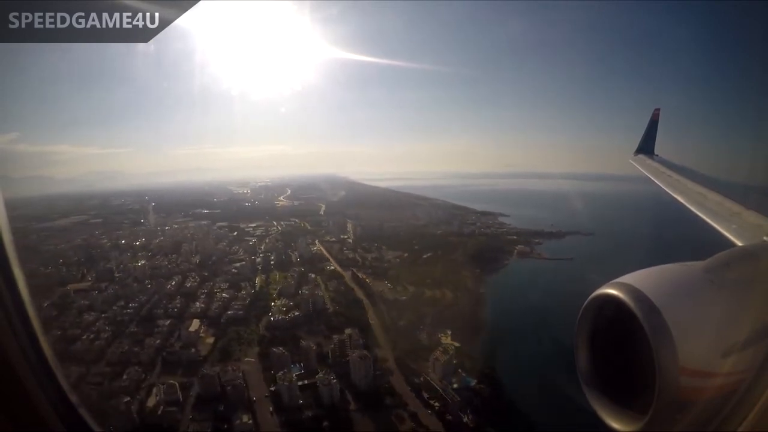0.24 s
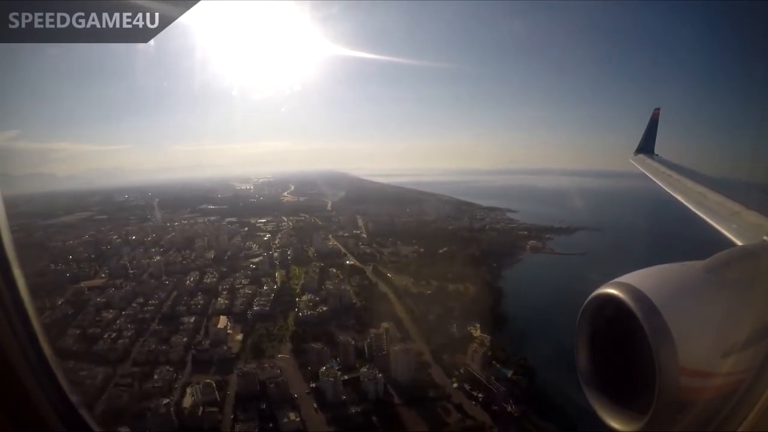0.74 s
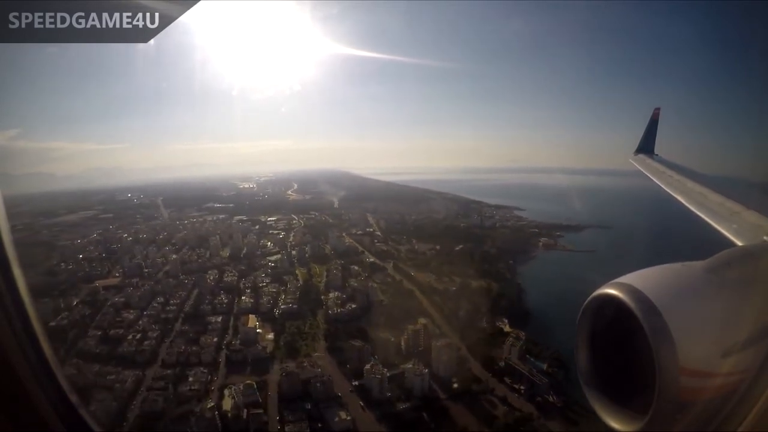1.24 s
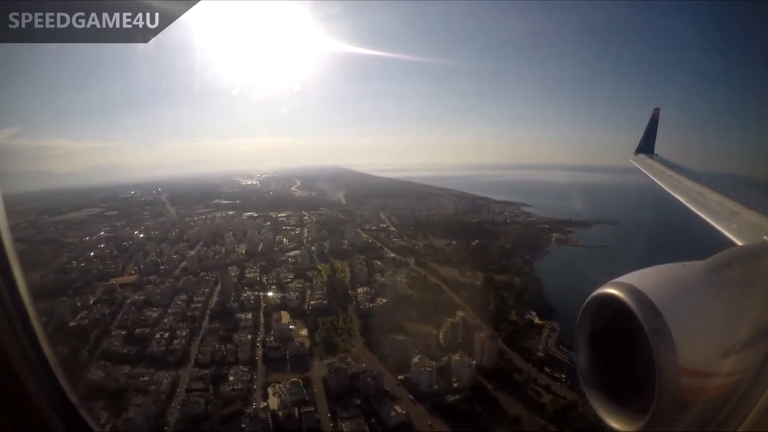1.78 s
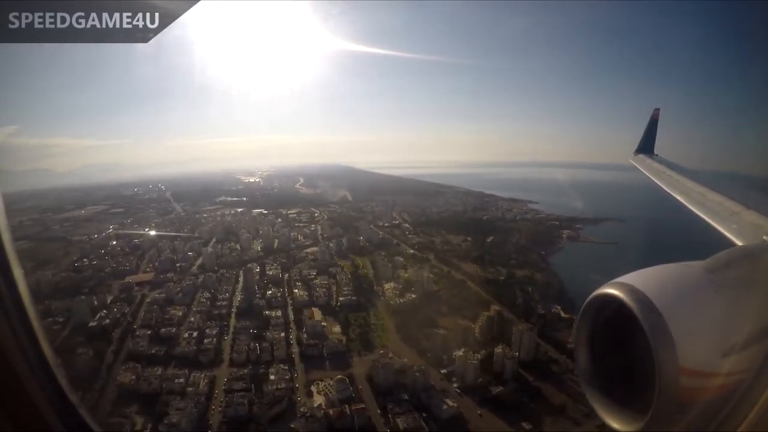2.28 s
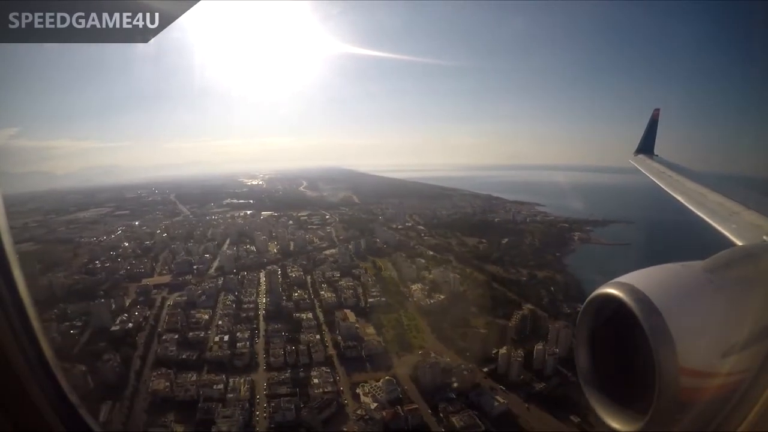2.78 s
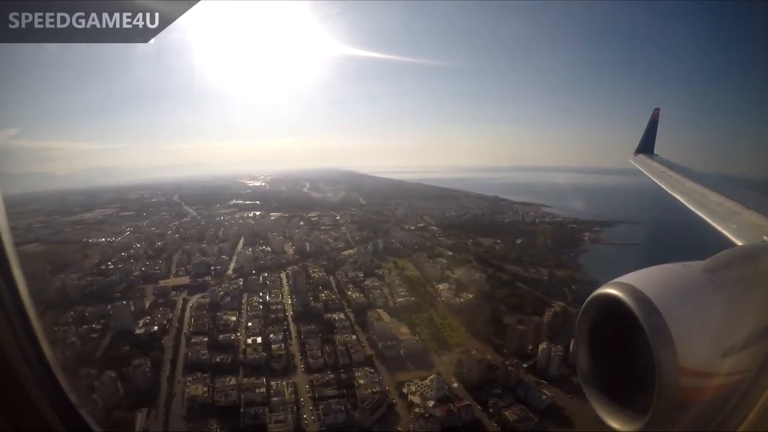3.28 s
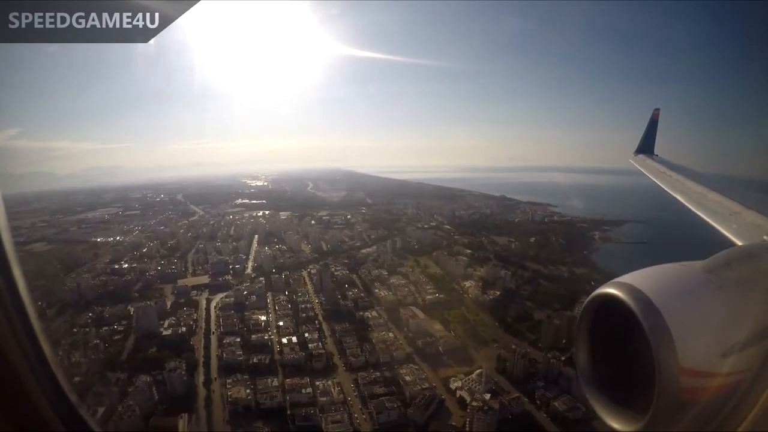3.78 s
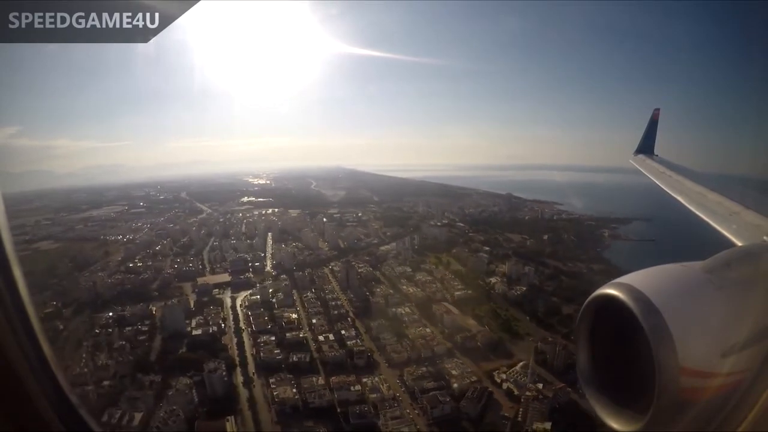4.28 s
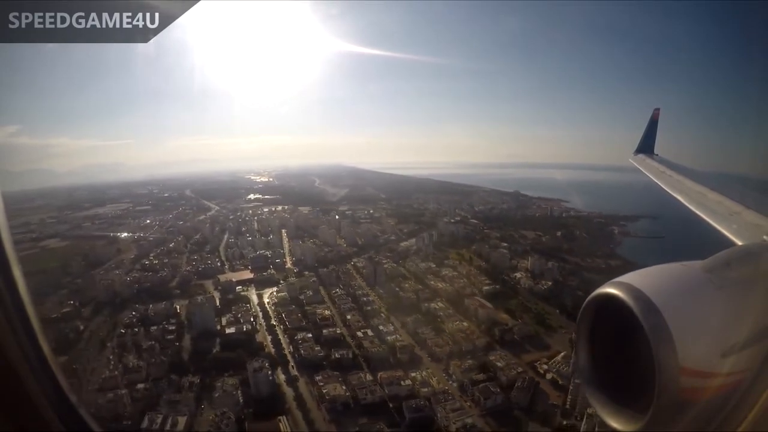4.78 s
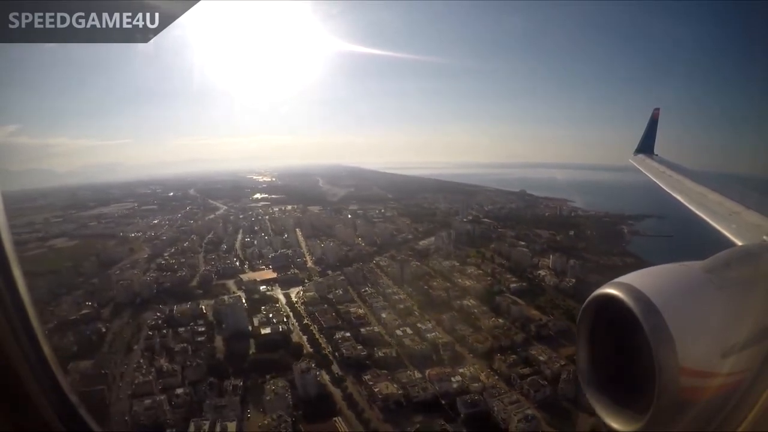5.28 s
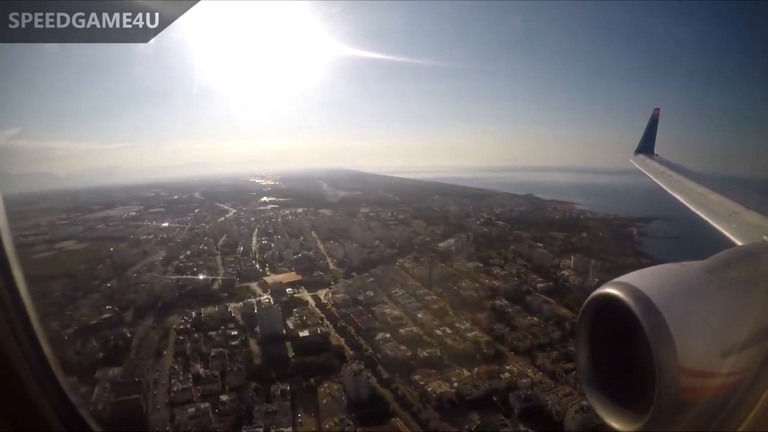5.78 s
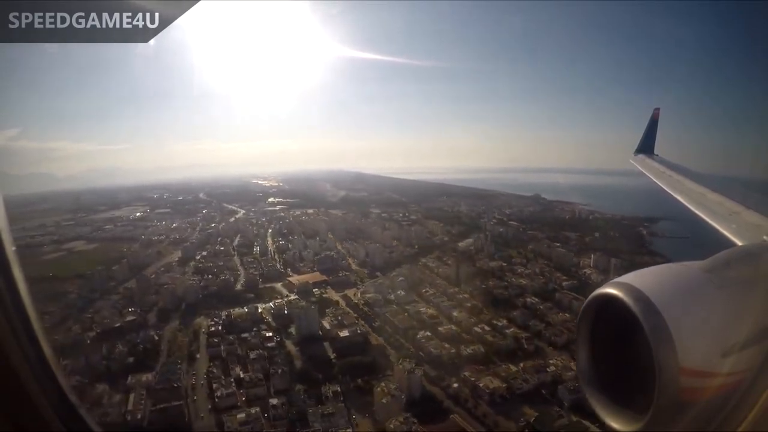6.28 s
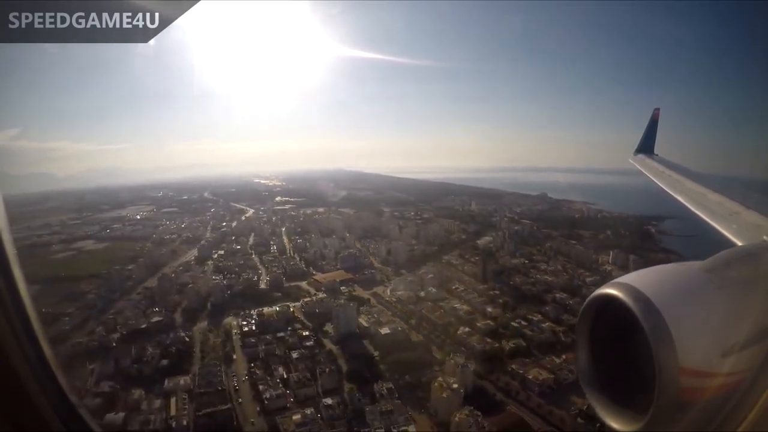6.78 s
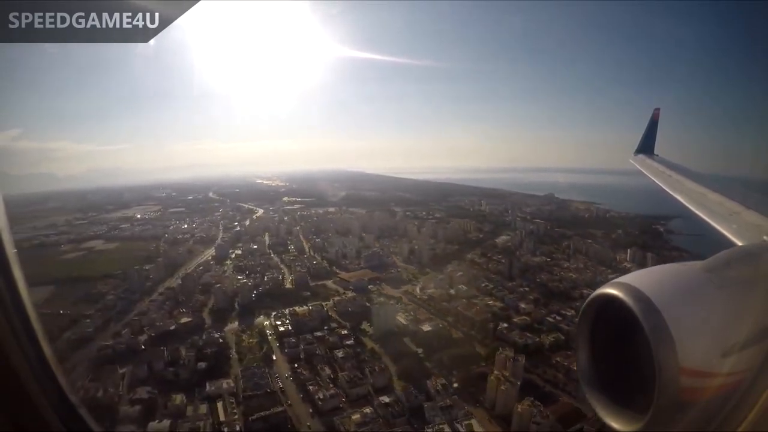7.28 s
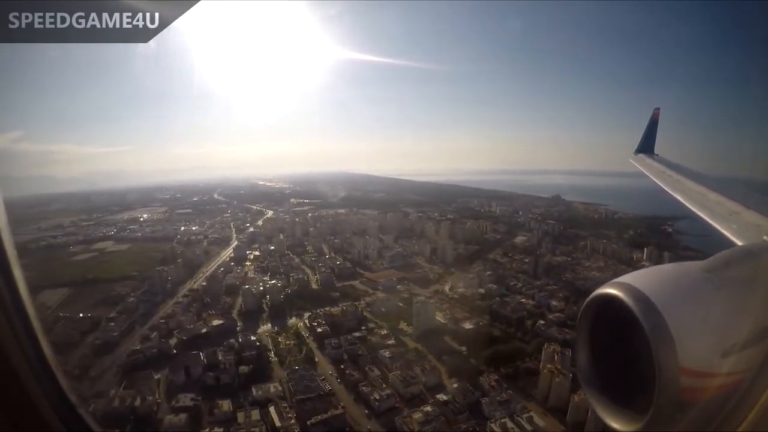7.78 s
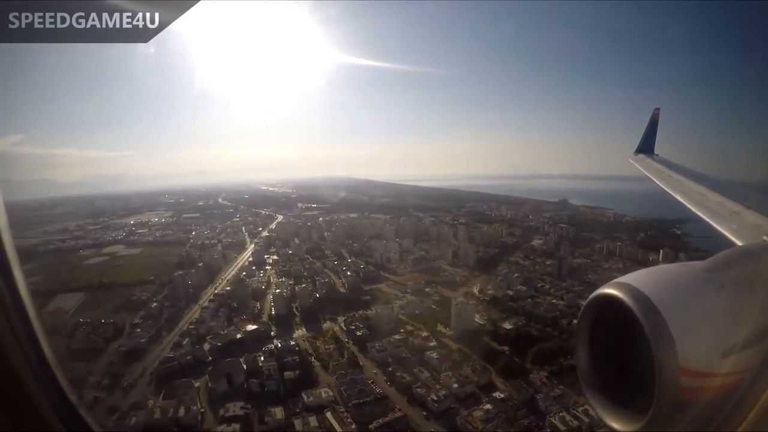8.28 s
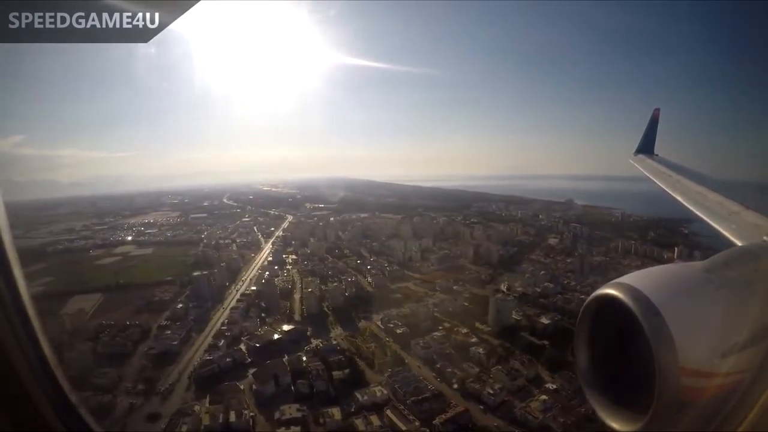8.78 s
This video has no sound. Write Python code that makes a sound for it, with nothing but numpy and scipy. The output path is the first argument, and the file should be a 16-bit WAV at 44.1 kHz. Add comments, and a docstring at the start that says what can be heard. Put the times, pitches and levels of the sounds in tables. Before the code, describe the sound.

Heard from a window seat beside the wing of an airliner in flight, a deep, steady rumble of engine and airflow fills the cabin, with a softer rush and light hiss above it. A faint, high engine whine slides down in pitch after about a second and a half, holds lower for several seconds, then climbs back near the end. The rumble stays even throughout.

```python
"""A deep, steady boom fills an airliner cabin beside the wing, with a rush and a hiss of air above it.
Engine and airflow noise excites the resonances of the cabin and of its wall and window panels.
The engine fan drones and whines at multiples of its shaft speed, so its tones glide together as it
spools down for a while and up again. The core shaft hums, and fans and electrics add thin tones."""
import sys
import numpy as np
from scipy.fft import rfft, irfft, next_fast_len
from scipy.io import wavfile
from scipy.ndimage import uniform_filter1d, map_coordinates

SR = 44100
rng = np.random.default_rng(int(sys.argv[2]) if len(sys.argv) > 2 else 0)


def transcribe(signal):
    """Save signal, clipped to [-1, 1], as a 16-bit WAV file at the path in sys.argv[1]."""
    frames = np.atleast_2d(signal).T
    limited = np.clip(frames, -1, 1)
    pcm = np.round(limited * 32767).astype(np.int16)
    wavfile.write(sys.argv[1], SR, pcm)


N = 399105

# noise levels: (time [s], boom [dB], panel rush [dB], whistle [dB], hiss [dB])
FLOW_LEVELS = [(0, -16, -44.5, -51, -64.5), (1.23, -16.5, -44.5, -51.5, -64), (3.2, -16.5, -46, -53, -65),
               (4.83, -16.5, -46, -55, -65), (6, -16.5, -45.5, -56, -65), (6.75, -18.5, -45.5, -50, -65),
               (7.25, -17, -45, -52, -64), (8.06, -16.5, -44.5, -49.5, -64.5), (8.6, -15.5, -45, -50, -64),
               (9.05, -17.5, -44.5, -52.5, -63.5)]
# cabin and floor resonances: (frequency [Hz], width [Hz], gain [dB])
CABIN_MODES = [(30, 19, -18), (55, 10, -7.5), (63.6, 15.5, 0), (88.5, 14, -0.5), (103.1, 20, -11.5),
               (126, 13, -17.5), (140.2, 22.8, -15), (162.7, 19, -22.5), (185, 13, -29), (208.5, 14, -23.5),
               (250, 25, -27), (278.3, 21.3, -22), (318.2, 22, -28.5), (372.6, 38, -39), (400.2, 22, -38)]
# wall and window resonances: (frequency [Hz], width [Hz], gain [dB])
PANEL_MODES = [(571, 35, -5.5), (611, 50, -10.5), (684, 50, -7), (748, 36, -4), (822, 60, -8),
               (986, 90, -8), (1063, 60, -7), (1104, 44, -12), (1180, 70, -8), (1330, 130, -16),
               (1487, 140, -12.5), (1596, 40, -10), (1644, 30, -8), (1720, 25, -14.5), (1802, 50, -7.5),
               (1825, 16, -11.5), (1928, 70, -12), (2046, 90, -11), (2204, 120, -9.5), (2425, 77, -12),
               (2530, 200, -24.5), (2800, 130, -19), (2918, 60, -17), (3247, 120, -18), (3400, 140, -19),
               (3790, 200, -15.5), (4016, 200, -17), (4314, 44, -18), (4436, 60, -17.5), (4640, 220, -25),
               (5300, 170, -33), (6000, 130, -37), (6070, 120, -37.5)]
# breathy band of air over a gap: (frequency [Hz], width [Hz], gain [dB])
GAP_BAND = [(1767.3, 32, 0)]
# spectrum of the hiss: (frequency [Hz], relative density [dB])
HISS_SPECTRUM = [(3000, -28), (4800, 0.5), (5600, -3), (6700, -7), (7500, -10), (8300, -9), (9500, -14.5),
                 (10400, -10), (11400, -14), (12500, -12), (13300, -15.5), (15100, -21.5)]
# the fan spools down, undershoots, settles and spools up: (time [s], speed [turns/s])
FAN_SPEED = [(0, 48.945), (1.25, 48.945), (1.45, 48.83), (1.6, 48.4), (1.81, 47.55), (2.23, 45.23),
             (2.41, 44.5), (2.55, 44.225), (2.72, 44.0), (2.9, 43.965), (3.08, 44.02), (3.5, 44.32),
             (3.75, 44.42), (4.3, 44.48), (5.6, 44.47), (6.68, 44.425), (6.8, 44.715), (7.16, 46.465),
             (7.34, 47.15), (7.52, 47.59), (7.7, 47.85), (7.95, 47.975), (9.05, 47.845)]
# resonances between the blade overtones and the cabin: (frequency [Hz], width [Hz], gain [dB])
BLADE_PATH = [(2140, 40, -7), (2270, 30, -8), (2350, 30, 0), (4322, 50, -1), (4440, 120, -7.5),
              (4697, 30, -1)]
# resonances between the higher whine and the cabin: (frequency [Hz], width [Hz], gain [dB])
WHINE_PATH = [(4312, 24, -14), (4425, 56, 1), (4545, 60, -4), (4705, 54, -1.5), (5375, 50, -5.5),
              (5427, 16, -10), (5530, 80, -2), (5610, 60, -9), (5690, 80, -6), (5785, 30, -8),
              (5853, 34, 1), (5975, 24, -6), (6495, 40, -12), (6690, 90, 0), (6875, 60, -1.5),
              (6965, 120, -1.5), (7142, 40, -4), (7900, 200, -5.5), (8150, 150, 0.5), (8320, 100, -3.5)]
# the two series: (order [cycles/turn]) and (level before path gain and strain [dB])
BLADE_ORDERS, BLADE_DB = [48, 96], [-62, -63.5]
WHINE_ORDERS, WHINE_DB = [98, 122, 146, 170], [-60, -67, -72, -82]
# faint high harmonics of the fan shaft: (order [cycles/turn])
FAINT_ORDERS = [120, 124, 148, 172, 220, 244, 268]
# their strength at full speed: (level [dB])
FAINT_DB = [-85, -87, -86, -90, -87, -90, -92]
# once-a-turn vibration of the fan: (time [s], level [dB])
SHAKE_LEVEL = [(0, -24), (1.5, -23.5), (2.5, -31.5), (4, -29), (6.7, -29), (7.5, -31), (9.05, -29)]
# the faster core shaft: (time [s], speed [turns/s], hum [dB], whistle [dB])
CORE_SHAFT = [(0, 210.6, -43, -86), (1.5, 210.5, -41, -87), (1.9, 207.5, -43, -92), (2.5, 204.5, -42, -100),
              (3.1, 204.5, -45, -100), (3.6, 207, -42, -100), (6.6, 207, -43, -100), (7.4, 209, -45, -98),
              (8, 210.5, -42, -94), (9.05, 209.5, -42, -94)]
# a hum that sags and recovers with the engine: (time [s], frequency [Hz], level [dB])
ENGINE_HUM = [(0, 483, -63), (1.3, 483, -70.5), (2.4, 472, -67), (3.2, 478, -66.5), (6.5, 478, -69.5),
              (7.6, 493, -67.5), (9, 487, -68)]
# steady tones of fans and electrics: (frequency [Hz], level [dB])
EQUIPMENT_TONES = [(400, -62), (1497, -69), (2439, -73), (3009, -79.5), (3033, -73.5)]

BLADE_COUNT, CORE_WHISTLE_ORDER = 24, 49
OFF_RESONANCE_DB = -19.5  # floor of the path gain
STRAIN_DB, STRAIN_KNEE = 3.5, 3  # largest boost as the speed changes; turns/s^2 that give most of it
CLIP_LEVEL, BAND_LIMIT_HZ = 0.73, 15160


def airflow():
    """Broadband excitation: engine and boundary-layer noise rings cabin and panels; air whistles, hisses."""
    boom_db, rush_db, whistle_db, hiss_db = curves(FLOW_LEVELS)
    hz, db = np.transpose(HISS_SPECTRUM)
    hiss = shaped_noise(lambda f: amp(np.interp(np.log(f + 1), np.log(hz), db)))
    boom = amp(boom_db) * resonant_noise(CABIN_MODES, steepness=1.77)
    rush = amp(rush_db + 0.31 * wobble(5)) * resonant_noise(PANEL_MODES, steepness=1.42)
    whistle = amp(whistle_db) * resonant_noise(GAP_BAND, steepness=1.5)
    return boom + rush + whistle + amp(hiss_db + .3 * wobble(4)) * hiss


def fan_drone(shaft_hz):
    """Periodic forcing: the wing carries in one shake a turn, and the passing blades give a clean tone."""
    shake = tone(shaft_hz, *curves(SHAKE_LEVEL), drift_hz=.1, flutter_db=.5)
    blade_pass = tone(BLADE_COUNT * shaft_hz, db=-61, drift_hz=.3, flutter_db=1.2)
    return shake + blade_pass


def fan_whine(shaft_hz):
    """Resonant transmission: shaft harmonics swell as they cross resonances and while the speed changes."""
    acceleration = uniform_filter1d(np.abs(np.gradient(shaft_hz)) * SR, size=SR // 10)
    strain_db = STRAIN_DB * np.tanh(acceleration / STRAIN_KNEE)
    series = [(BLADE_ORDERS, BLADE_DB, BLADE_PATH), (WHINE_ORDERS, WHINE_DB, WHINE_PATH)]
    whine = np.zeros(N)
    for orders, levels, path in series:
        for order, db in zip(orders, levels):
            hz = order * shaft_hz
            path_db = 10 * np.log10(amp(2 * OFF_RESONANCE_DB) + modal_power(hz, path, steepness=2))
            whine += tone(hz, db + strain_db + path_db, drift_hz=.8, flutter_db=.6)
    return whine


def engine_core():
    """Shaft orders: the core hums at its rotation rate and whistles thinly at a high multiple of it."""
    core_hz, hum_db, whistle_db = curves(CORE_SHAFT)
    hum = tone(core_hz, hum_db, drift_hz=.5, flutter_db=1.5)
    whistle = tone(CORE_WHISTLE_ORDER * core_hz, whistle_db, drift_hz=2, flutter_db=2)
    return hum + whistle


def engine_hum():
    """Frequency modulation: one quiet tone sags in pitch and recovers with the engine."""
    return tone(*curves(ENGINE_HUM), drift_hz=1.4, flutter_db=2.0)


def equipment():
    """Steady periodic sources: fans and electrics each hold a thin tone near one frequency."""
    return sum(tone(hz, db, drift_hz=2.5, flutter_db=1.0) for hz, db in EQUIPMENT_TONES)


def faint_fan_harmonics(shaft_hz):
    """High shaft orders: weak tones that sink in pitch and level as the fan slows."""
    fade_db = 90 * (shaft_hz / shaft_hz.max() - 1)
    return sum(tone(order * shaft_hz, db + fade_db, drift_hz=1.5, flutter_db=2.5)
               for order, db in zip(FAINT_ORDERS, FAINT_DB))


def modal_power(f, modes, steepness):
    """Incoherent addition: the powers of independent resonances add at frequency f."""
    return sum(amp(2 * db) * (1 + (2 * (f - hz) / width) ** 2) ** -steepness for hz, width, db in modes)


def resonant_noise(modes, steepness):
    """Random excitation of modes: the amplitude spectrum is the root of their summed power."""
    return shaped_noise(lambda f: np.sqrt(modal_power(f, modes, steepness)))


def shaped_noise(gain):
    """Linear filtering: white noise weighted by a gain over frequency, then scaled to rms 1."""
    size = next_fast_len(N)
    spectrum = rfft(rng.standard_normal(size)) * gain(np.fft.rfftfreq(size, 1 / SR))
    noise = irfft(spectrum, size)[:N]
    return noise / np.sqrt(np.mean(noise ** 2) + 1e-20)


def tone(hz, db, drift_hz, flutter_db):
    """Random modulation: a sine that wavers about frequency hz and rms level db."""
    phase = 2 * np.pi * (np.cumsum(hz + drift_hz * wobble(12)) / SR + rng.random())
    return np.sqrt(2) * amp(db + flutter_db * wobble(8)) * np.sin(phase)


def wobble(rate):
    """Spline interpolation: a smooth curve through random knots, rate of them a second."""
    knots = rng.standard_normal(int(N * rate / SR) + 4)
    return map_coordinates(knots, [np.arange(N) * rate / SR])


def curves(rows):
    """Linear interpolation: one value per sample for each column after the time."""
    times, *columns = np.transpose(rows)
    return [np.interp(np.arange(N) / SR, times, column) for column in columns]


def amp(db):
    """Decibel law: 20 dB is a factor of ten in amplitude."""
    return 10 ** (np.asarray(db) / 20)


def scene():
    """Superposition: the pressures of all sources add at one point in the cabin."""
    shaft_hz, = curves(FAN_SPEED)
    main = airflow() + fan_drone(shaft_hz) + fan_whine(shaft_hz) + engine_core()
    background = engine_hum() + equipment() + faint_fan_harmonics(shaft_hz)
    return (main + background)[None]


def record(dry):
    """Saturation and band limiting: the tallest booms are rounded off and the top treble is removed."""
    soft = dry / (1 + np.abs(dry / CLIP_LEVEL) ** 3) ** (1 / 3)
    soft *= np.minimum(1, np.arange(N) / (.004 * SR))  # 4 ms fade-in
    mirrored = np.hstack([soft, soft[:, ::-1]])  # ends meet smoothly, so the steep edge does not ring
    hz = np.fft.rfftfreq(2 * N, 1 / SR)
    return irfft(rfft(mirrored) * (hz < BAND_LIMIT_HZ), 2 * N)[:, :N]


dry = scene()
out = record(dry)
transcribe(out)
```